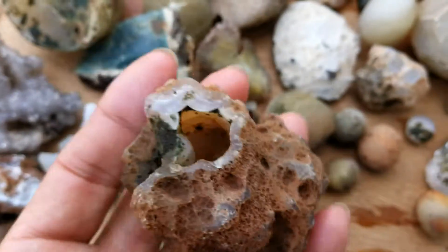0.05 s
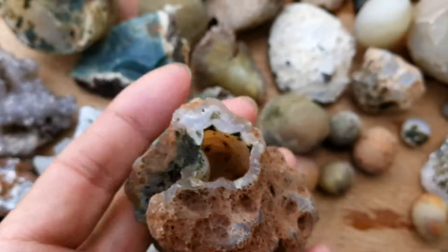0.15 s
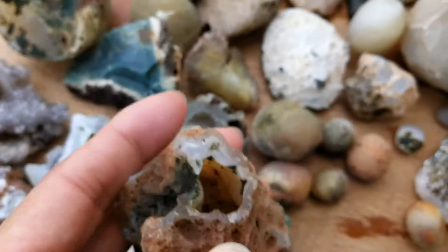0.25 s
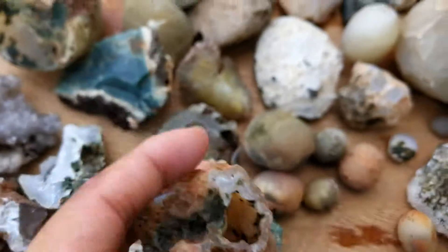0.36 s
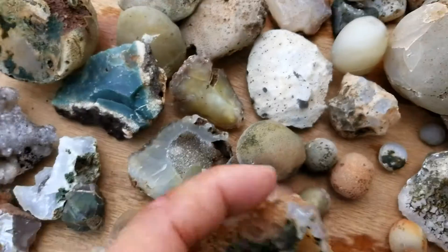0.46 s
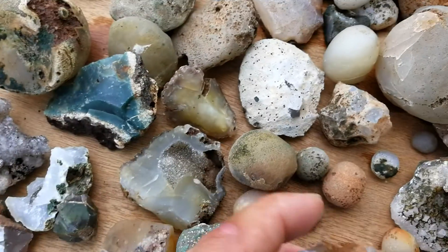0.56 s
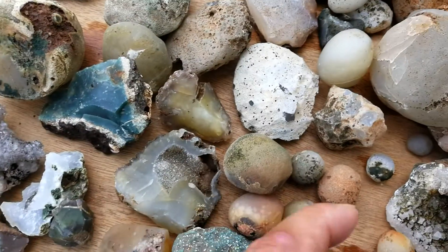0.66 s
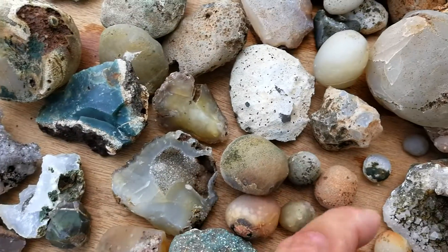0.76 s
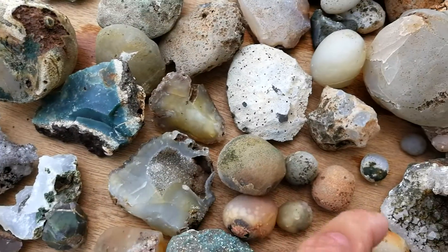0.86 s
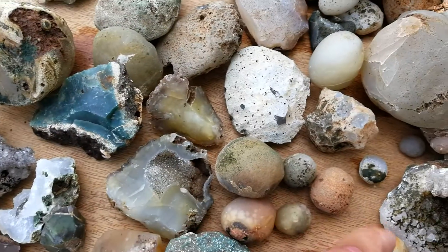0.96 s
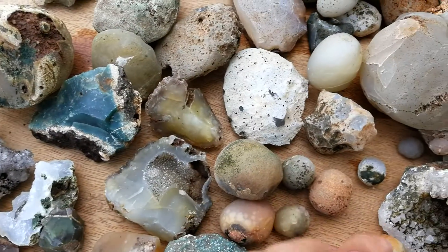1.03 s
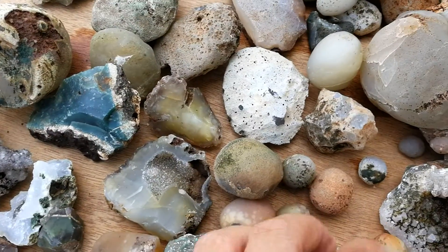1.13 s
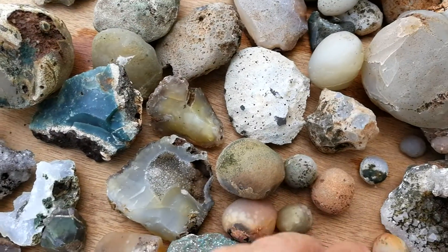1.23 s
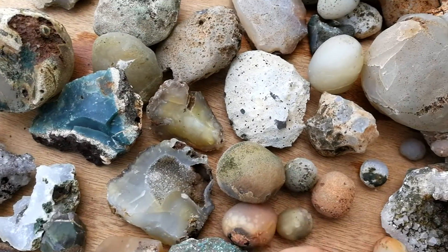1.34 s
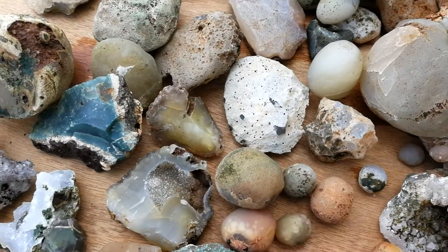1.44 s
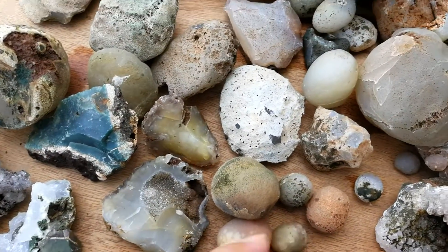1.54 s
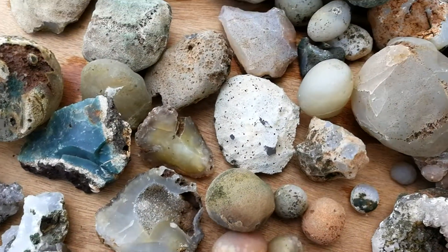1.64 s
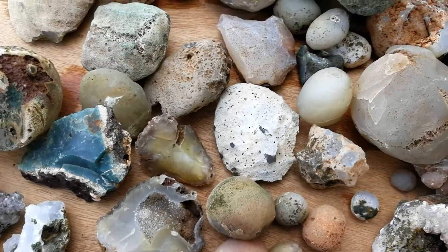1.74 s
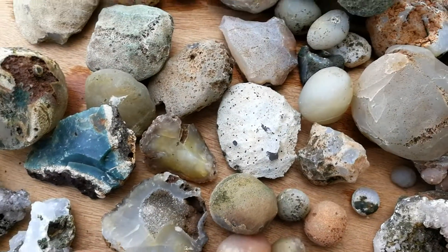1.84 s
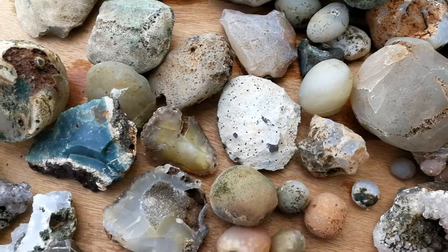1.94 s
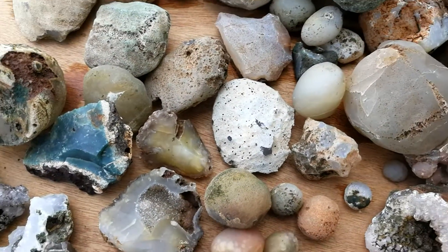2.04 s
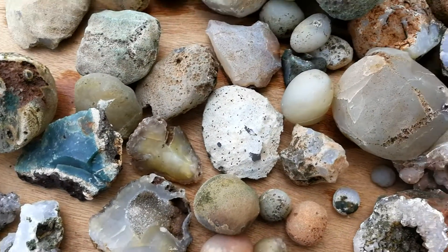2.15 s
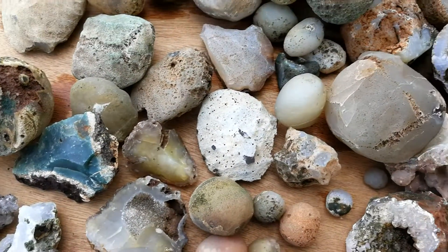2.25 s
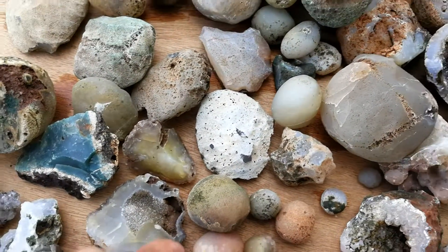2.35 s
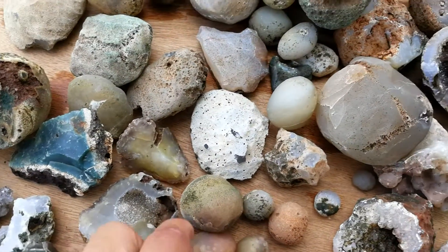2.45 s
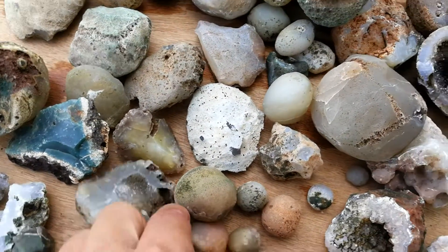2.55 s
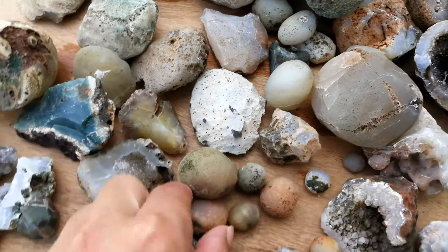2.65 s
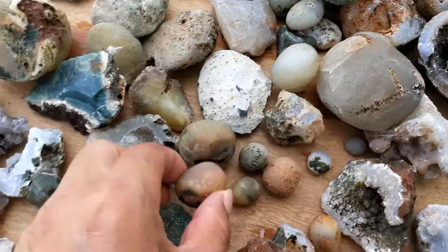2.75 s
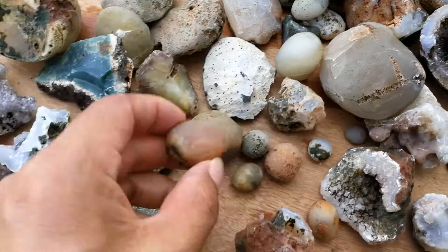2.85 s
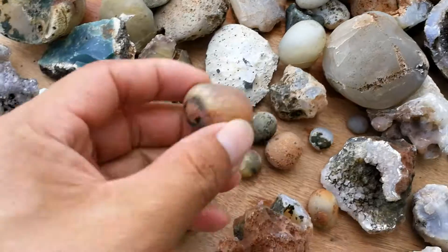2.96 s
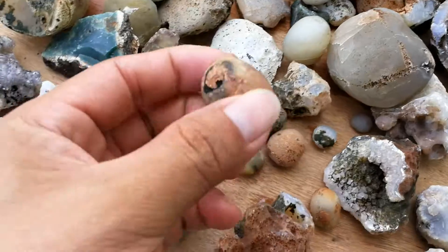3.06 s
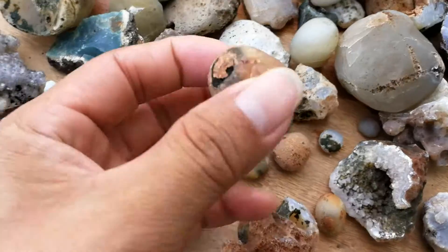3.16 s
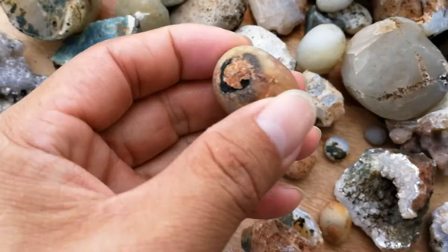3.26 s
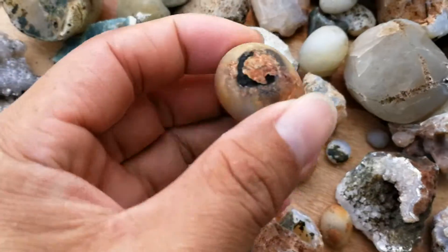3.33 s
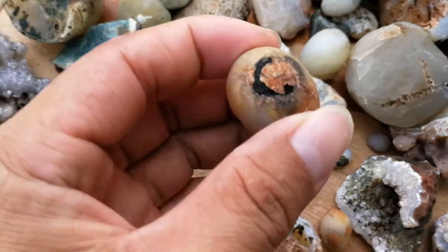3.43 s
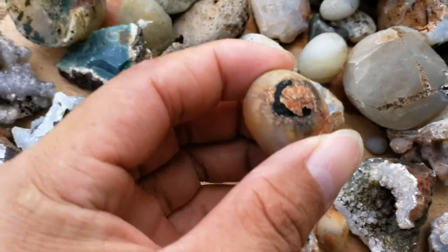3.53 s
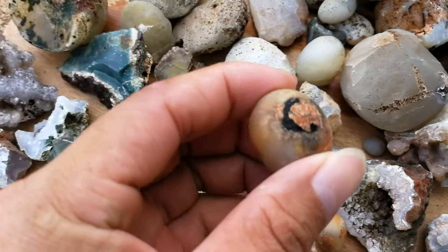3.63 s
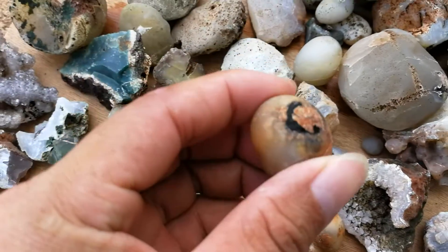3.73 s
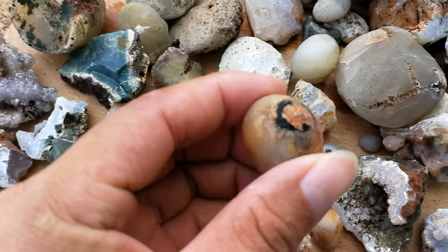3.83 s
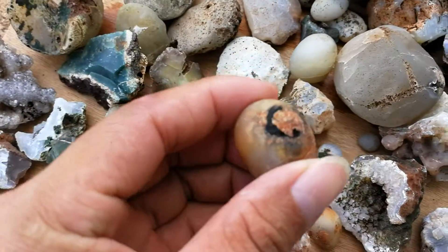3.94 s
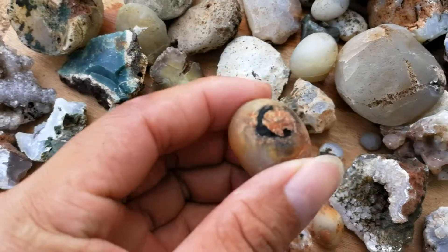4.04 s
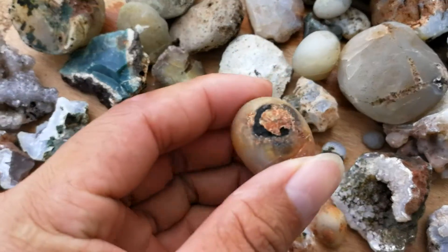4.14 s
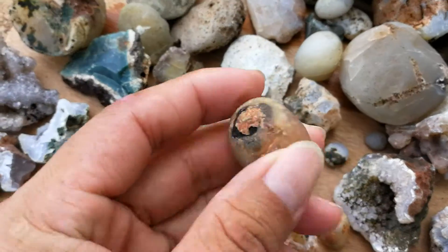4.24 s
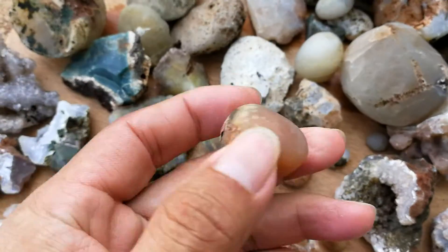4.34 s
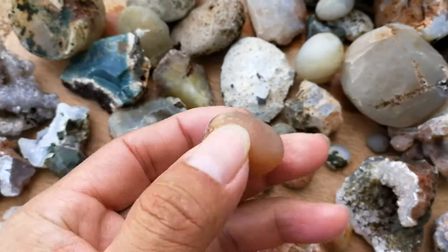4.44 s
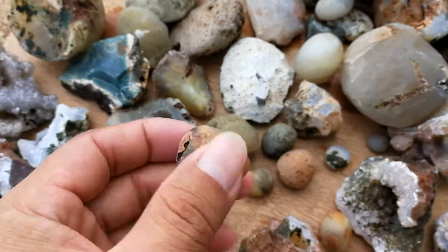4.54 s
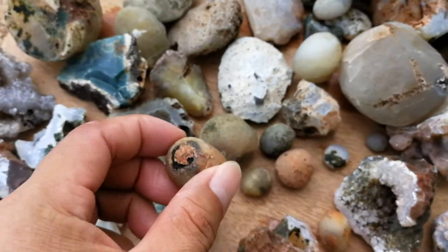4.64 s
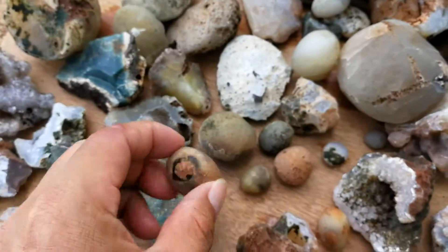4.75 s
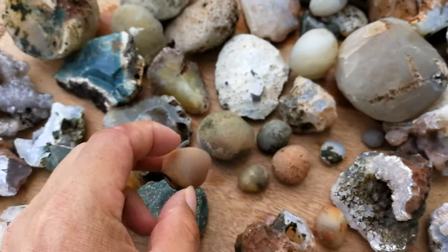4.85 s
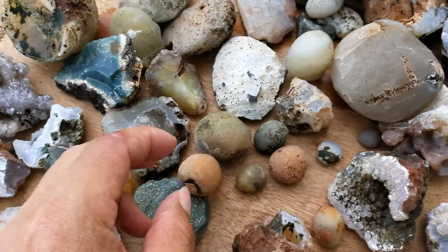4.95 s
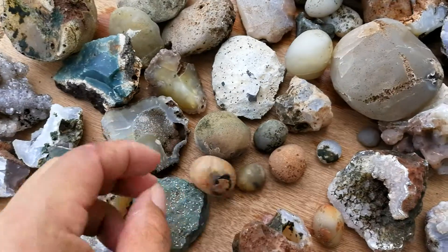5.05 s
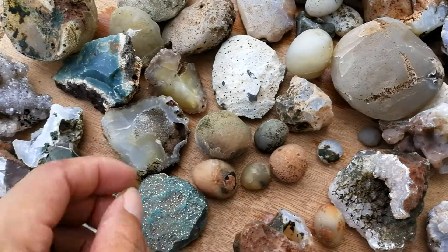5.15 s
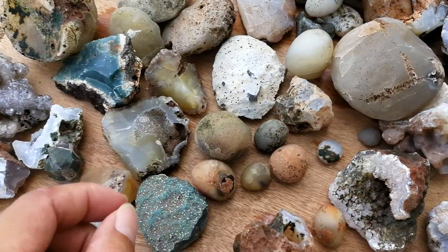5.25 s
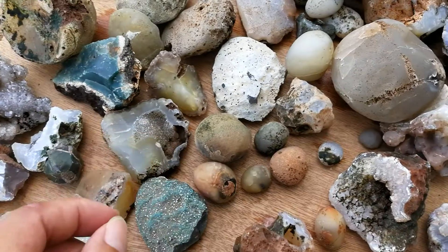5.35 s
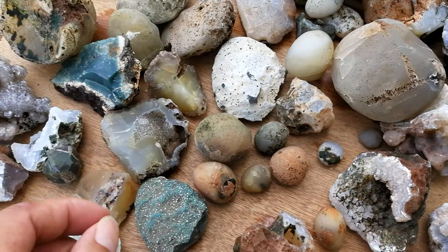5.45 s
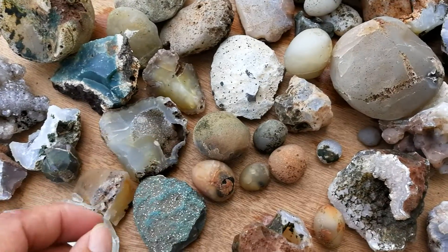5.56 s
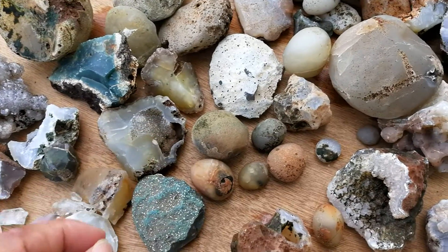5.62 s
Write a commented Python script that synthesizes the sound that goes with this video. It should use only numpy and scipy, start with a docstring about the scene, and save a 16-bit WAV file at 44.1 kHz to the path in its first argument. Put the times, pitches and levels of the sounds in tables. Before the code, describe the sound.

Close clacks and gritty scrapes of pebbles being moved and set down on wood, while small birds whistle faintly in the distance.

```python
"""Stones on a wooden board, set down, dragged and nudged by hand near a stereo microphone outdoors.
Each blow knocks the board, stone clicks on stone, and rough faces grate and hiss as they slide.
A big porous rock lands and settles, ringing in its own modes. Farther off, small birds whistle
and chirp among echoing trees, over a low distant rumble."""
import sys
import numpy as np
from scipy import signal
from scipy.fft import rfft, irfft, next_fast_len
from scipy.io import wavfile
from scipy.ndimage import uniform_filter1d

SR = 44100
rng = np.random.default_rng(int(sys.argv[2]) if len(sys.argv) > 2 else 0)


def store_wav(level_fs):
    """Save 16-bit WAV to argv[1]."""
    pcm = np.round(np.clip(np.atleast_2d(level_fs), -1, 1) * 32767)
    wavfile.write(sys.argv[1], SR, pcm.T.astype(np.int16))


N = 250929


def from_db(db):
    """Gain of a level."""
    return 10 ** (np.asarray(db) / 20)


def pan(db):
    """Left and right gains, the left louder by db."""
    return from_db(db * np.array([[.5], [-.5]]))


def unit_rms(x):
    """Scaled to rms 1."""
    return x / np.sqrt(np.mean(x ** 2) + 1e-20)


def unit_peak(x):
    """Scaled to peak 1."""
    return x / np.abs(x).max()


def at_hz(points, hz):
    """A spectrum table read on a log axis."""
    freqs, values = np.transpose(points)
    return np.interp(np.log(hz), np.log(freqs), values)


def band(x, low_hz, high_hz):
    """Butterworth band-pass."""
    sos = signal.butter(2, [low_hz, min(high_hz, .45 * SR)], "band", fs=SR, output="sos")
    return signal.sosfilt(sos, x)


def wander(low_hz, high_hz):
    """Random motion within a band, at rms 1."""
    return unit_rms(band(rng.standard_normal(N), low_hz, high_hz))


def ring(x, hz, t60):
    """One damped mode: a unit click sets a sine of height 1 ringing."""
    r, w = from_db(-60 / (t60 * SR)), 2 * np.pi * hz / SR
    return signal.lfilter([0, np.sin(w)], [1, -2 * r * np.cos(w), r * r], x + 1e-18)


def add(out, s, sound):
    """Lays a short sound in at s seconds."""
    i = round(s * SR)
    out[..., i:i + sound.shape[-1]] += sound[..., :N - i]


def grains(per_s, spread_db, channels):
    """Random clicks of uneven size."""
    sizes = from_db(spread_db * np.minimum(rng.exponential(1, (channels, N)), 4))
    return sizes * rng.choice([-1, 1], (channels, N)) * (rng.random((channels, N)) < per_s / SR)


def swell(s, db, rise_s, fall_s):
    """Gain that climbs 20 dB per rise time to a peak, sinks 20 dB per fall time and stops."""
    t = np.arange(N) / SR - s
    away = np.maximum(-t / rise_s, t / fall_s)
    return from_db(db - 20 * away) * np.clip(2 * (1.6 - away), 0, 1)


# Open air all round the microphone: f/Hz, relative level per Hz/dB
AIR_SPECTRUM = [(25, -9.5), (94, -3), (249, -12.5), (335, -17.5), (531, -24), (1400, -27), (2350, -28.5),
                (4870, -27.5), (6050, -29.5), (14800, -39), (16000, -42)]
# How alike it is on the two sides: f/Hz, left-right correlation
AIR_CORRELATION = [(60, 0.99), (180, 0.98), (550, -0.42), (1650, 0.043), (4970, -0.37), (15000, 0.2)]
# Its lean to one side: f/Hz, left minus right/dB
AIR_PAN = [(60, -2), (240, 2.5), (950, 2), (3770, 1.5), (15000, 3.5)]
# Low hum, dead centre: f/Hz, level/dB, width/Hz
HUM_TONES = [(72.75, -67, 4.4), (96.8, -69.5, 7.6), (248, -75, 2.9)]

def air(level_db, patchy_db):
    """Distant rumble and faint hiss in slowly drifting half-octave bands, with a wavering hum."""
    out, edges = 0, 20 * 2 ** np.arange(0, 10, .5)
    white = rng.standard_normal((2, 2, N + SR))
    steps = np.arange(0, N + 4000, 4000)
    for k, (low, high) in enumerate(zip(edges, edges[1:])):
        mid, side = band(white[k % 2], low, high if k < len(edges) - 2 else SR)[:, SR:]
        hz = np.sqrt(low * high)
        alike = at_hz(AIR_CORRELATION, hz)
        patches = np.interp(np.arange(N), steps, rng.standard_normal(len(steps)))
        gain = from_db(at_hz(AIR_SPECTRUM, hz) + patchy_db * patches) * pan(at_hz(AIR_PAN, hz))
        out = out + gain * (np.sqrt(1 + alike) * mid + np.sqrt(1 - alike) * side * [[1], [-1]])
    hum = sum(from_db(db) * unit_rms(ring(rng.standard_normal(N + SR), hz, 2.2 / width)[SR:])
              for hz, db, width in HUM_TONES)
    return from_db(level_db) * unit_rms(out) + hum


# Two long drags across the board, a list of points for each: t/s, grit level/dB
DRAG_CURVES = [
    [(2.05, -67), (2.14, -62), (2.16, -55), (2.25, -55.5), (2.29, -47.5), (2.318, -65.5), (2.45, -73)],
    [(2.49, -65), (2.53, -55), (2.6, -43), (2.63, -55), (2.665, -46.5), (2.68, -31), (2.72, -41.5),
     (2.755, -45.5), (2.775, -108)],
]

def drags():
    """Gain of the grating along both drags, silent outside them."""
    gain, t = np.zeros(N), np.arange(N) / SR
    for points in DRAG_CURVES:
        s, db = np.transpose(points)
        gate = np.clip(np.minimum(t - s[0], s[-1] - t) / .006, 0, 1)
        gain += gate * from_db(np.interp(t, s, db))
    return gain


# Brief scuffs, nearby on the left: peak t/s, grit level/dB, hiss re grit/dB, rise/s, fall/s
STONE_SCUFFS = [(0.224, -63.5, -2, 0.14, 0.02), (.312, -62, 1, 0.0039, 0.11),
                (1.049, -43, -16, 0.02, 0.016), (1.292, -61, 2.5, 0.024, 0.021),
                (1.452, -60.5, -23, 0.0089, 0.045), (2.82, -48, -13, 0.094, 0.11),
                (3.201, -63.5, -6.5, 0.52, 0.55), (4.99, -61, -21, 0.0028, 0.16),
                (5.184, -46.5, -7.5, 0.015, 0.022)]

def slides(drag_hiss_db, hiss_pan_db, grit_pan_db):
    """Grains of rough faces catch in short jerks: fine ones hiss, coarse ones grate."""
    grit_gain = drags()
    hiss_gain = from_db(drag_hiss_db) * grit_gain
    for s, db, hiss_db, rise, fall in STONE_SCUFFS:
        grit_gain += swell(s, db, rise, fall)
        hiss_gain += swell(s, db + hiss_db, rise, fall)
    jerks = from_db(1.7 * wander(20, 160))
    hiss = unit_rms(jerks * band(grains(per_s=6000, spread_db=1.6, channels=2), 4700, 18000))
    coarse = jerks * grains(per_s=4000, spread_db=2.6, channels=2)
    grit = band(coarse, 1500, 5500) + from_db(-2) * band(coarse, 3200, 4300) + band(coarse, 1450, 2300)
    grit = band(unit_rms(grit), 700, SR)
    return hiss_gain * hiss * pan(hiss_pan_db) + grit_gain * grit * pan(grit_pan_db)


# Pebbles striking the board, near the microphone, with the bright upper knock of the big rock's thud at 1.329
# s: t/s, level before the low cut/dB, centre f/Hz
PEBBLE_KNOCKS = [(0.31, -35.5, 1940), (0.757, -43.5, 970), (0.794, -41.5, 1200), (1.321, -38.5, 1310),
                 (1.329, -27.5, 1670), (1.541, -47, 1130), (1.608, -27, 906), (1.685, -26, 825),
                 (1.766, -33, 930), (1.816, -29.5, 1050), (1.885, -38, 856), (1.92, -39, 930),
                 (1.959, -45, 930), (1.992, -50.5, 950), (2.615, -10, 1040), (2.641, -27, 1160),
                 (2.654, -8, 1090), (2.686, -9, 1070), (2.811, -10.5, 990), (2.829, -14, 1000),
                 (2.844, -15, 1170), (2.94, -4, 980), (2.949, -15.5, 1260), (2.963, -35, 1310),
                 (2.986, -30, 960), (3.006, -42, 1310), (3.023, -28.5, 1240), (3.051, -37, 760),
                 (3.066, -30.5, 650), (3.087, -45, 1040), (3.108, -37, 1010), (3.13, -34.5, 960),
                 (3.164, -26, 1290), (3.194, -40.5, 1130), (3.641, -41.5, 2130), (4.982, -1, 984),
                 (5.002, -20, 1165), (5.043, -48, 1150), (5.068, -31, 1160), (5.085, -30, 1180),
                 (5.11, -41, 1190), (5.123, -31, 1180), (5.156, -14, 1290), (5.164, -22.5, 1290),
                 (5.173, -6.5, 1540), (5.187, -34, 1200), (5.194, -22.5, 1260), (5.202, -3.5, 1200),
                 (5.217, -14, 1300), (5.247, -34, 1260), (5.44, -34, 1320)]
# Modes of the wooden board: f/Hz, relative level/dB, t60/s
BOARD_MODES = [(520, -17, 0.029), (789, -10, 0.012), (1185, -7.5, 0.039), (1550, -5, 0.0064),
               (1680, -8.5, 0.014), (2080, 0, 0.013)]

def knocks(events, push_cycles, ring_db, low_cut_hz):
    """A soft contact swells, shivers as it settles, and the board modes ring on briefly."""
    out, click, t = np.zeros(N), signal.unit_impulse(2000), np.arange(2000) / SR
    mode_jitters_db = rng.normal(0, 5, (len(events), len(BOARD_MODES)))
    signs = rng.choice([-1, 1], len(events))
    shiver_db, shiver_t60 = -30, .049   # tiny contacts after each knock
    shivers = rng.standard_normal((len(events), len(t))) * from_db(shiver_db - 60 * t / shiver_t60)
    for (s, db, hz), jitter, sign, shiver in zip(events, mode_jitters_db, signs, shivers):
        push_t60 = push_cycles / hz
        contact = ring(ring(click + shiver, .87 * hz, push_t60), 1.775 * hz, push_t60)
        push = ring(contact, hz, push_t60)
        modes = sum((-1) ** k * from_db(mode_db + jitter[k]) * ring(contact, mode_hz, t60)
                    for k, (mode_hz, mode_db, t60) in enumerate(BOARD_MODES))
        blow = unit_peak(push) + from_db(ring_db) * unit_peak(modes)
        add(out, s, sign * from_db(db) * blow)
    # a small board radiates no bass
    return signal.sosfilt(signal.butter(2, low_cut_hz, "high", fs=SR, output="sos"), out)


# Stone on stone, nearby on the left: t/s, level before panning/dB, ring f/Hz, edge re ring/dB
STONE_CLICKS = [(0.3109, -26.5, 5700, -8), (1.019, -27, 2230, -9.5), (1.043, -25, 2550, -20),
                (1.145, -46.5, 9000, 7), (1.285, -54, 9300, -15), (2.177, -43, 3770, 6),
                (2.232, -35, 2600, -20), (2.251, -33, 4570, -16), (2.2612, -39.5, 7750, 11.5),
                (2.284, -28.5, 4500, 5), (2.2922, -22, 4270, -33), (2.3096, -28.5, 4400, -33),
                (2.488, -42, 4930, -4), (2.499, -28, 4400, -8), (2.5274, -30.5, 3030, -2),
                (2.547, -29.5, 3620, -1.5), (2.5937, -25.5, 3900, -32), (2.637, -24, 3400, -25),
                (2.7, -24.5, 7100, -13), (2.7206, -21, 4450, -31), (2.81, -27, 3300, -16),
                (2.8188, -30, 2520, 4), (2.8426, -19.5, 2830, -17), (2.909, -35.5, 4320, 1),
                (2.9492, -25.5, 3560, -18), (3.1629, -28, 3170, -14.5), (4.98, -4, 5370, -21),
                (5.0007, -23.5, 4100, -37.5), (5.065, -33.5, 2750, -28), (5.155, -29, 2480, -17),
                (5.1727, -8.5, 2580, -31), (5.203, -28, 2780, -34)]

def clicks(crack_t60, tail_t60, tail_db, ring_pan_db, edge_pan_db):
    """A hard crack of uneven contacts: a damped stone ring and a bright edge, with a short scatter."""
    out, t = np.zeros((2, N)), np.arange(1500) / SR
    attack = np.minimum(t / .0004, 1)
    decay = from_db(-60 * t / crack_t60) + from_db(tail_db - 60 * t / tail_t60)
    bursts = rng.standard_normal((len(STONE_CLICKS), 2, len(t))) * attack * decay
    for (s, db, hz, edge_db), burst in zip(STONE_CLICKS, bursts):
        stone = pan(ring_pan_db) * unit_peak(band(burst, .6 * hz, 1.52 * hz))
        edge = pan(edge_pan_db) * unit_peak(band(burst, 5400, 18000))
        add(out, s + .0005, from_db(db) * (stone + from_db(edge_db) * edge))
    return out


# Rising calls off in the trees: start t/s, top t/s, start f/Hz, top f/Hz, level/dB
BIRD_ARCHES = [(.38, 0.538, 5080, 5650, -78), (.585, 0.677, 5250, 5930, -75),
               (1.79, 1.847, 5050, 5750, -82), (2.9, 3.105, 3500, 4420, -71),
               (3.83, 3.891, 5150, 5680, -80), (4.0, 4.049, 5300, 5800, -80)]

def arches(even_share=.36, rush_s=.037, hook_s=.0335, hook_hz=950, opening_db=-1.5):
    """A bird's pitch climbs slowly, rushes to the top and hooks over."""
    for s, top_s, from_hz, top_hz, db in BIRD_ARCHES:
        t = np.arange(s - top_s, hook_s, 1 / SR)   # zero at the top
        before_top = np.minimum(t, 0)
        growth = np.exp(before_top / rush_s)
        rush = (growth - growth[0]) / (1 - growth[0])
        climb = even_share * (1 - before_top / t[0]) + (1 - even_share) * rush
        hook = hook_hz * np.maximum(t / hook_s, 0) ** 2
        yield s, from_hz + (top_hz - from_hz) * climb - hook, db + opening_db * (1 - climb)


# Chirps off in the trees: t/s, length/s, start f/Hz, end f/Hz, level/dB
BIRD_CHIRPS = [(0.388, 0.034, 3920, 4300, -75), (1.54, 0.048, 5270, 6300, -76),
               (1.818, 0.07, 3530, 2570, -74), (3.345, 0.087, 6740, 4340, -68),
               (3.502, 0.027, 5590, 3670, -68.5), (3.603, 0.036, 7030, 3400, -65),
               (3.745, 0.031, 5240, 3660, -70.5), (3.906, 0.043, 6190, 4160, -65),
               (4.051, 0.057, 6130, 4270, -63), (4.736, 0.057, 6300, 4330, -67.5),
               (4.904, 0.058, 6420, 4250, -69.5), (5.092, 0.037, 5700, 4040, -69)]

def chirps():
    """A bird's pitch sweeps fast in a straight line."""
    for s, length, from_hz, to_hz, db in BIRD_CHIRPS:
        t = np.arange(0, length, 1 / SR)
        yield s, from_hz + (to_hz - from_hz) * t / length, db


# Whistles off in the trees: t/s, length/s, start f/Hz, held f/Hz, settling/s, end droop/Hz, level/dB
BIRD_WHISTLES = [(0.68, 0.27, 5100, 4640, 0.033, 0, -79), (0.722, 0.205, 5950, 4600, .065, 600, -75),
                 (0.84, 0.305, 6600, 4720, 0.05, 0, -73), (1.87, .165, 5850, 4850, 0.03, 400, -78),
                 (4.115, 0.23, 6120, 4680, 0.043, 0, -77), (4.247, 0.17, 6100, 4500, 0.08, 350, -69),
                 (4.423, 0.13, 4620, 4730, 0.02, 400, -78), (5.302, 0.17, 4850, 4710, .015, 0, -76),
                 (5.475, .19, 4710, 4690, .015, 0, -83)]

def whistles(droop_s=.018, opening_db=-13):
    """A bird glides onto a held note, growing louder; some notes droop at the end."""
    for s, length, from_hz, held_hz, settle_s, droop_hz, db in BIRD_WHISTLES:
        t = np.arange(0, length, 1 / SR)
        settling = np.exp(-t / settle_s)
        droop = droop_hz * np.exp((t - length) / droop_s)
        yield s, held_hz + (from_hz - held_hz) * settling - droop, db + opening_db * settling


def birds(wobble_db, rasp, echo_db, echo_t60, pan_db):
    """Gliding near-sines, raspy on the fast chirps, smeared by scattered echoes from the trees."""
    song, flutter = np.zeros(N), wander(80, 500)
    waver = 1 + .004 * wander(15, 80)
    for s, hz, db in [*arches(), *chirps(), *whistles()]:
        t, now = np.arange(len(hz)) / SR, slice(round(s * SR), round(s * SR) + len(hz))
        pitch = uniform_filter1d(hz, size=400, mode="nearest") * waver[now]
        gate = np.clip(np.minimum(t, t[-1] - t) / .0046, 0, 1)
        sweep_hz_per_s = abs(hz[-1] - hz[0]) / t[-1]
        rough = np.clip(rasp * sweep_hz_per_s / 40000, 0, 1)
        tone = np.sin(2 * np.pi * np.cumsum(pitch) / SR) * (1 - rough + rough * flutter[now])
        add(song, s, np.sqrt(2) * gate * from_db(db) * tone)
    song *= from_db(wobble_db * wander(8, 45))
    t = np.arange(SR // 4) / SR
    scatter = rng.standard_normal((2, len(t))) * from_db(-60 * t / echo_t60)
    scatter /= np.sqrt(np.sum(scatter ** 2) / 2)
    echoes = signal.fftconvolve(song[None], scatter, axes=1)[:, :N]
    return (song + from_db(echo_db) * echoes) * pan(pan_db)


# The big porous rock landing and settling nearby: t/s, level before filtering/dB, knock f/Hz
ROCK_THUDS = [(1.018, -20, 735), (1.046, -28.5, 890), (1.085, -35.5, 975), (1.111, -32, 894),
              (1.143, -16, 1116), (1.186, -29, 1330), (1.194, -15.5, 1110), (1.212, -37.5, 1186),
              (1.328, -31.5, 800), (1.355, -40.5, 1040)]
# Its own modes: f/Hz, relative level/dB, t60/s
ROCK_MODES = [(281, -3, 0.11), (745, 10.5, 0.017), (1620, 16.5, 0.0018), (2100, -9, 0.036),
              (2560, -14, 0.1)]

def rock(crunch_t60, gain_db):
    """The rock's rough underside lands on several points in quick succession and sets its modes going."""
    out, t = np.zeros(N), np.arange(2000) / SR
    crunches = rng.standard_normal((len(ROCK_THUDS), len(t))) * from_db(-60 * t / crunch_t60)
    mode_jitters_db = rng.normal(0, 4, (len(ROCK_THUDS), len(ROCK_MODES)))
    for (s, db, _), crunch, jitter in zip(ROCK_THUDS, crunches, mode_jitters_db):
        modes = sum(from_db(mode_db + jitter[k]) * unit_rms(ring(crunch, hz, t60))
                    for k, (hz, mode_db, t60) in enumerate(ROCK_MODES))
        add(out, s, from_db(db + gain_db) * unit_peak(modes))
    return band(out, 200, 3200)


# A stone rolling or rocking on the board, nearby: peak t/s, level/dB, rise/s, fall/s
STONE_ROLLS = [(1.023, -43.5, .003, 0.058), (1.199, -33, 0.041, 0.029), (1.458, -51, 0.033, 0.031),
               (2.681, -37, 0.092, .12), (2.81, -42.5, .05, 0.086), (2.965, -48, 0.07, .17),
               (5.0, -44.5, .01, 0.13), (5.111, -47.5, 0.065, 0.044), (5.225, -44.5, 0.069, 0.041)]

def rolls(per_s, spread_db):
    """Quick soft bumps; each lands elsewhere and drives a random few of the lower board modes."""
    bumps = grains(per_s, spread_db, channels=1)[0]
    hits = rng.random((len(BOARD_MODES), N)) < 1 / 3
    modes = sum(from_db(db) * ring(bumps * hit, hz, .4 * t60)
                for (hz, db, t60), hit in zip(BOARD_MODES[:-1], hits))
    softened = ring(ring(modes, hz=1000, t60=.0018), hz=1550, t60=.0018)
    return sum(swell(*row) for row in STONE_ROLLS) * unit_rms(band(softened, 450, SR))


def microphone_ports(board, direct_db, echo_db, echo_s, echo_cutoff_hz):
    """The right port hears the board directly and again round the housing: a notch near 650 Hz."""
    size = next_fast_len(N)
    f = np.fft.rfftfreq(size, 1 / SR)
    echo = from_db(echo_db) * np.exp(-2j * np.pi * f * echo_s) / (1 + 1j * f / echo_cutoff_hz)
    right = irfft(rfft(board, size) * (from_db(direct_db) + echo), size)[:N]
    return np.array([board, right])


def scene():
    """Board sounds pass the microphone's two ports; the rest is already stereo."""
    board = rolls(per_s=700, spread_db=3.8)
    board += knocks(ROCK_THUDS, push_cycles=8.5, ring_db=-12, low_cut_hz=320)
    board += knocks(PEBBLE_KNOCKS, push_cycles=4.02, ring_db=-14, low_cut_hz=828)
    board += rock(crunch_t60=.033, gain_db=-2.5)
    return (microphone_ports(board, direct_db=-6, echo_db=-7.5, echo_s=.000711, echo_cutoff_hz=2520)
            + clicks(crack_t60=.005, tail_t60=.025, tail_db=-20, ring_pan_db=7, edge_pan_db=11)
            + birds(wobble_db=2, rasp=.5, echo_db=1, echo_t60=.11, pan_db=4)
            + air(level_db=-61, patchy_db=.5)
            + slides(drag_hiss_db=-3.5, hiss_pan_db=12.5, grit_pan_db=2.5))


def record(dry):
    """The top is cut steeply, 60 dB down at 16.5 kHz."""
    return signal.sosfilt(signal.cheby2(14, 60, 16500, fs=SR, output="sos"), dry)


dry = scene()
out = record(dry)
store_wav(out)
```